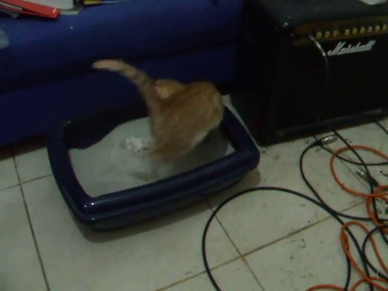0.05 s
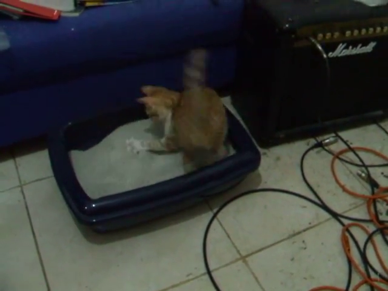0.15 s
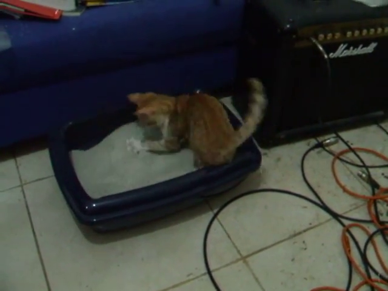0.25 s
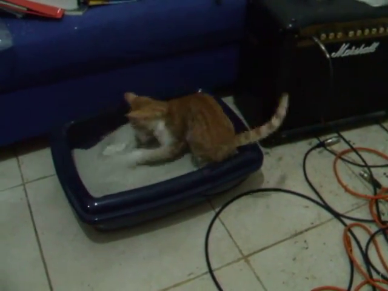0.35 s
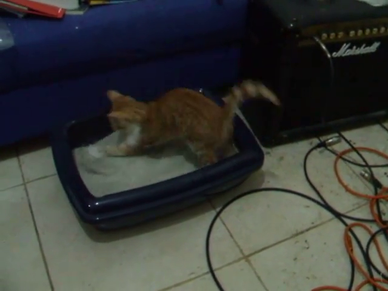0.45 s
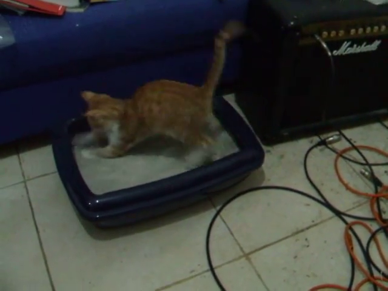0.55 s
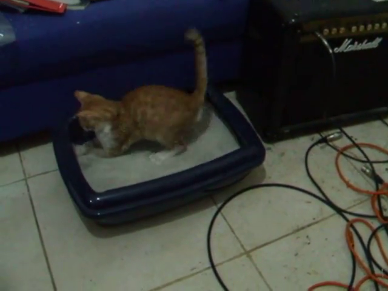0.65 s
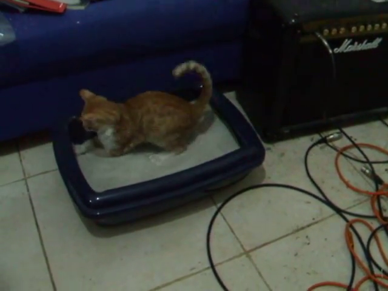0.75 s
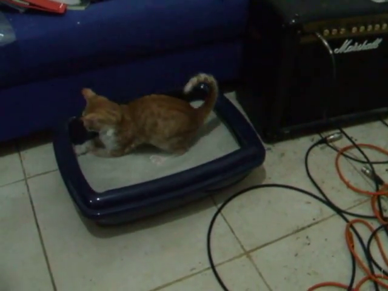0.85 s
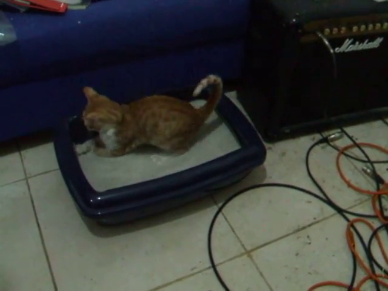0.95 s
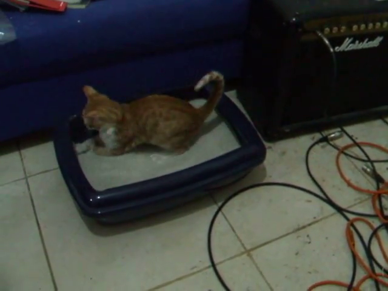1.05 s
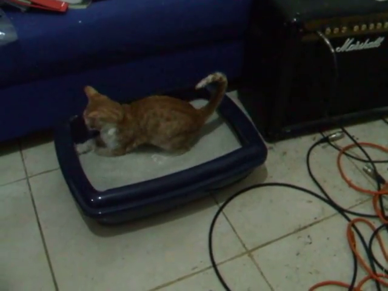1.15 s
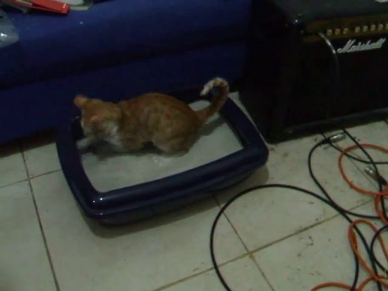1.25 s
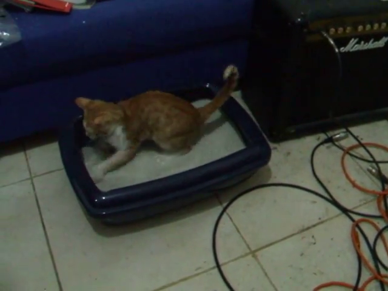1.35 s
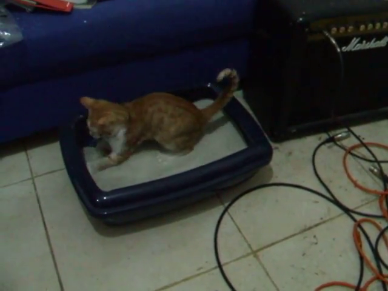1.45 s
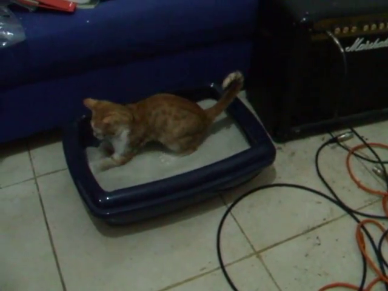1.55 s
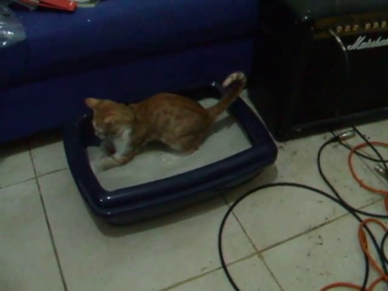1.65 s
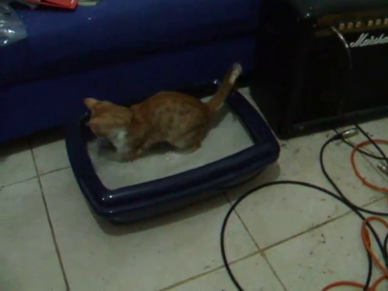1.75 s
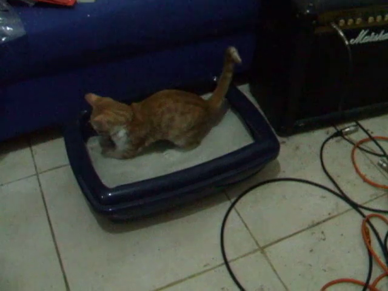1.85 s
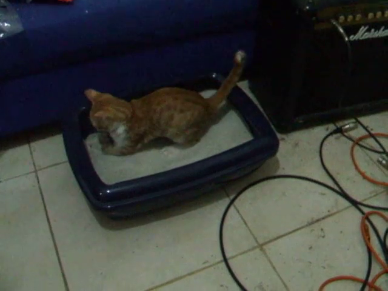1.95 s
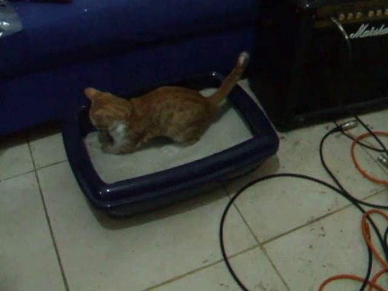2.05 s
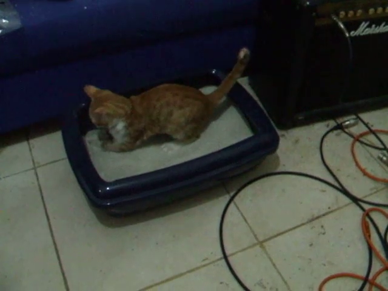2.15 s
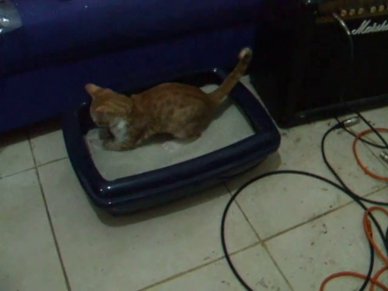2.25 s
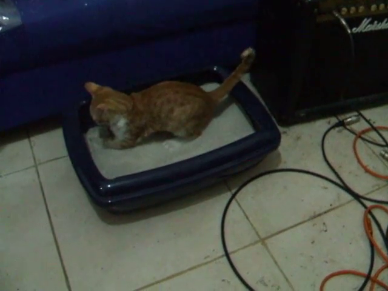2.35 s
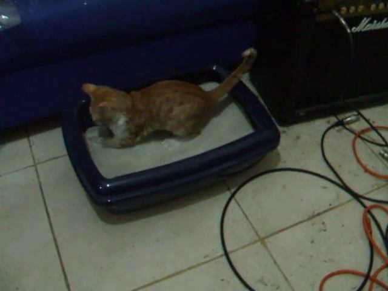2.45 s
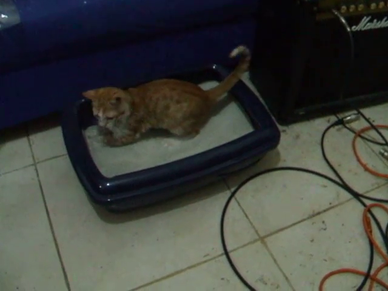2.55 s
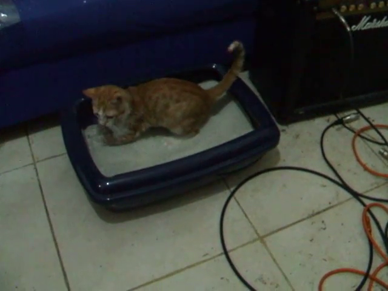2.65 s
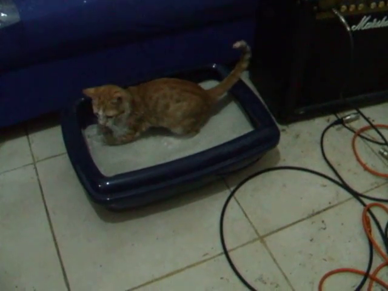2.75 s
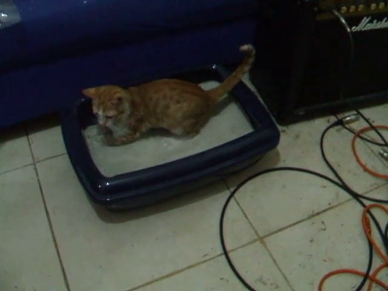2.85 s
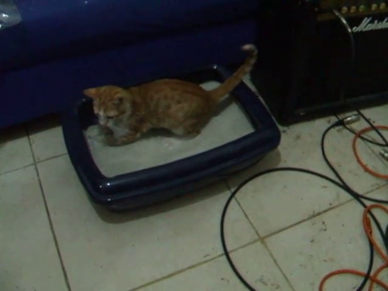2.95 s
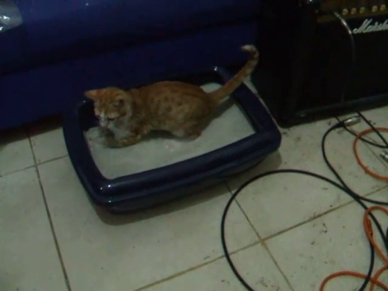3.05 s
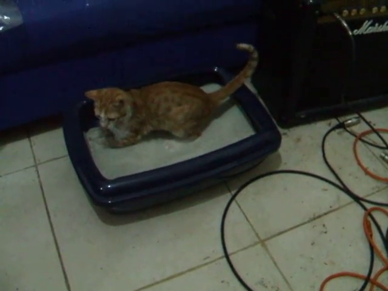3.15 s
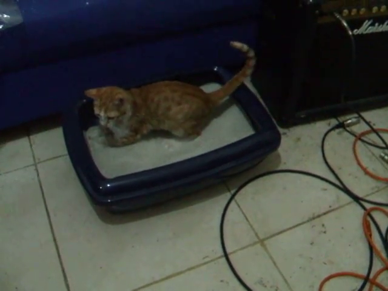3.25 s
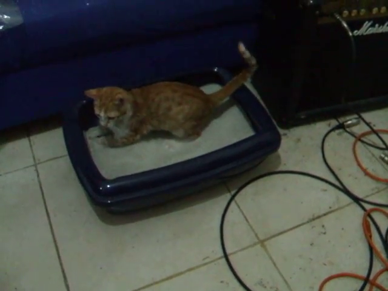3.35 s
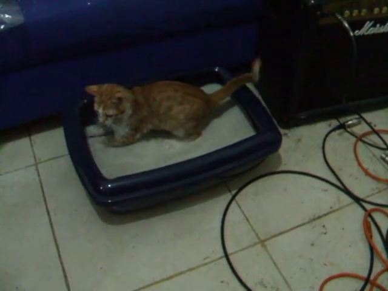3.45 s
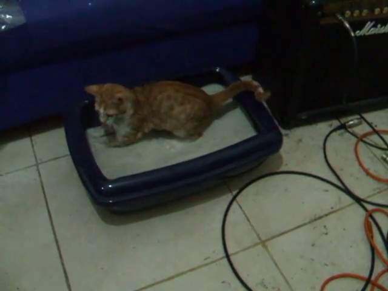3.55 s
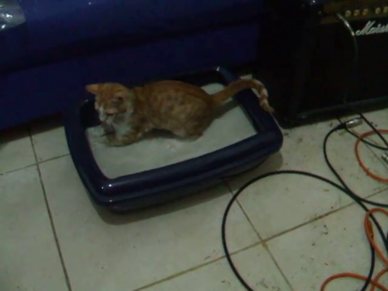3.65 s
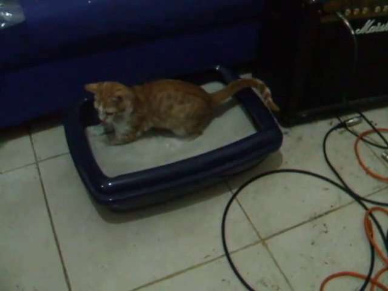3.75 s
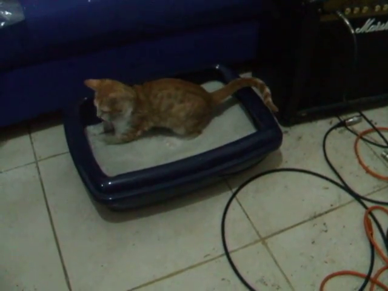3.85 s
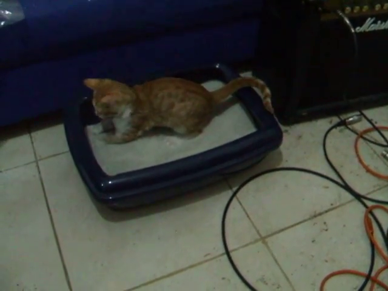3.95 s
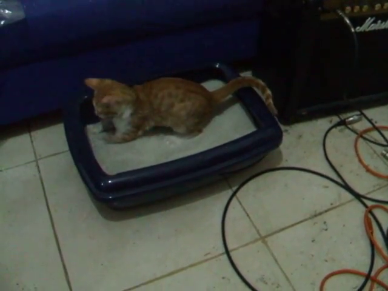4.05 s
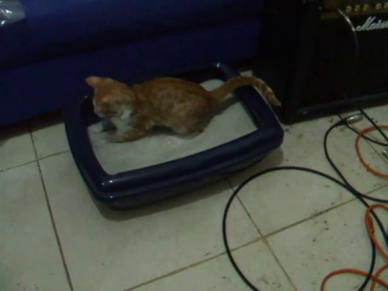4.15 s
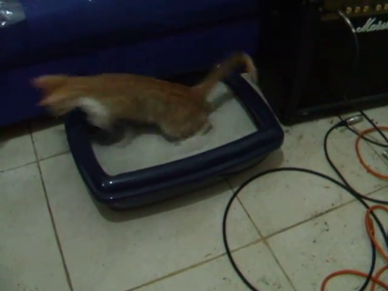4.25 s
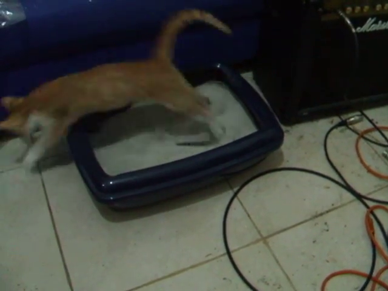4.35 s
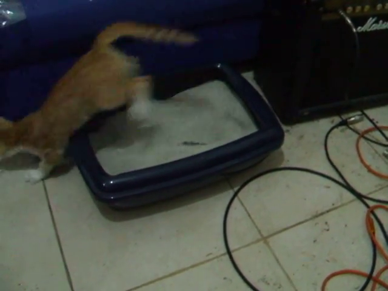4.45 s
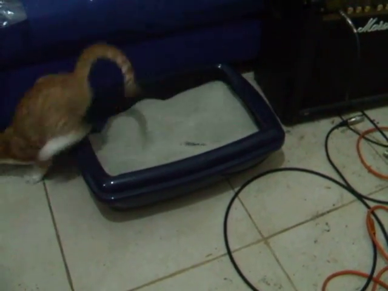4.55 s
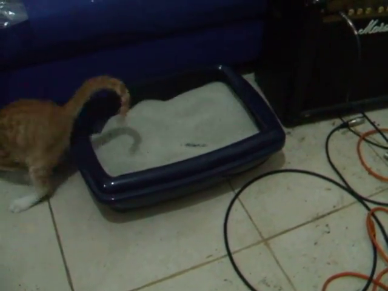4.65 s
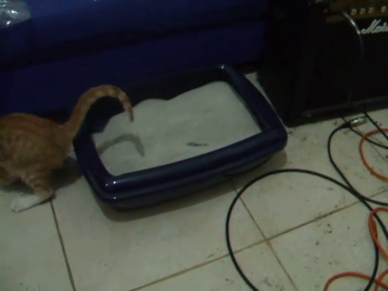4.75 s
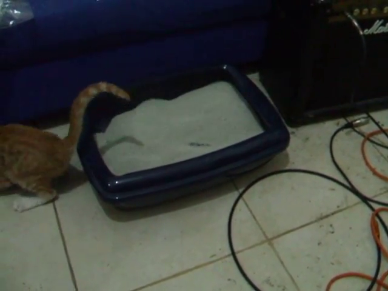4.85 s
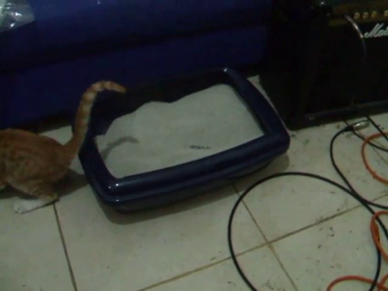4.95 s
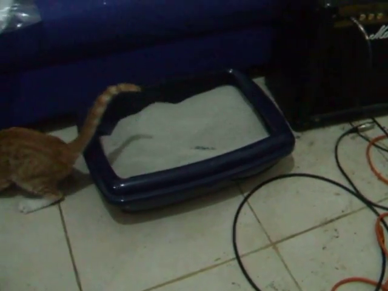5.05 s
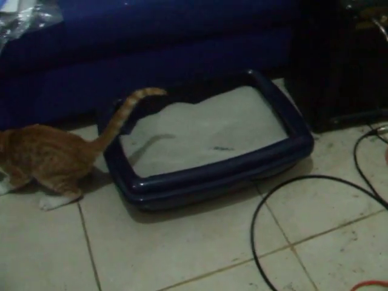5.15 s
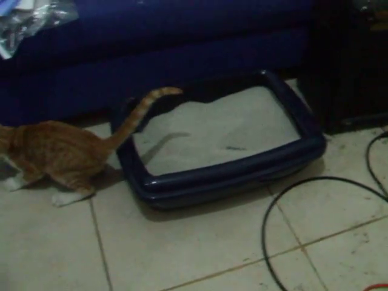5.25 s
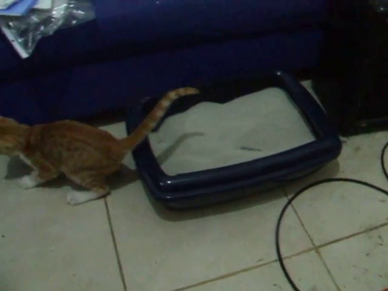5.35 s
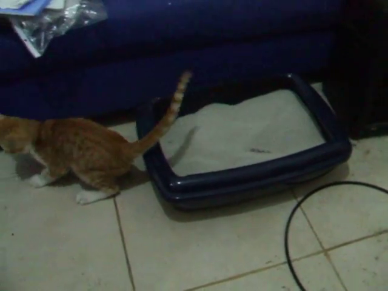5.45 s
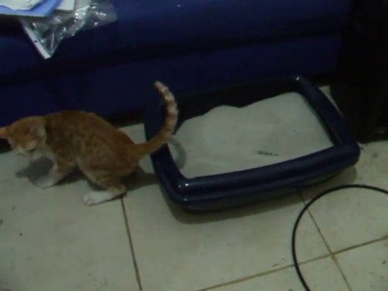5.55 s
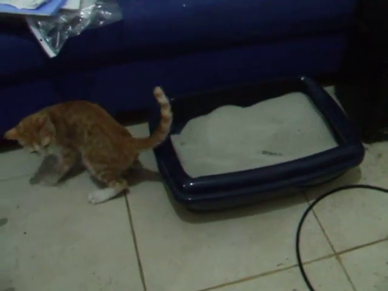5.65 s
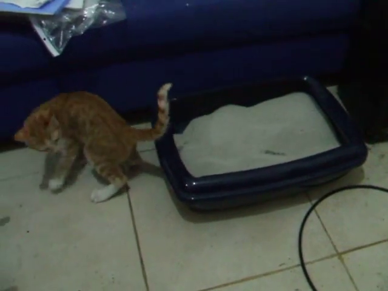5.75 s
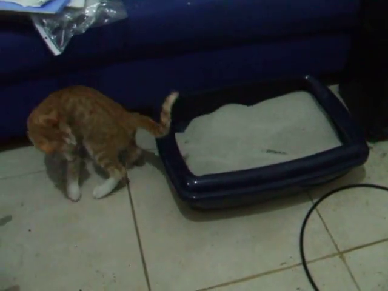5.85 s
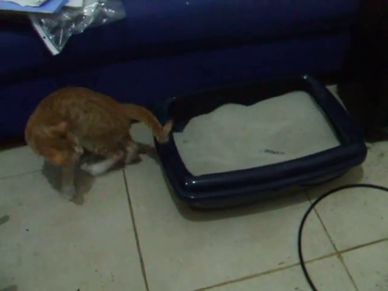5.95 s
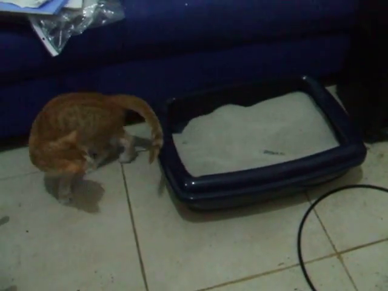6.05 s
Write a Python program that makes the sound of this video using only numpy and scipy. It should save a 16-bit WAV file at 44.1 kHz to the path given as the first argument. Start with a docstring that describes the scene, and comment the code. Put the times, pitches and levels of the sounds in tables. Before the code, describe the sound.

A kitten digs in a plastic tray of dry granular litter, heard close up in a small tiled room with a short reverberation. A wavering low hum, a thin high electronic whine and the gritty hiss of a cheap camera run throughout. From 0 to 0.8 seconds, quick overlapping strokes rasp and crunch, with hollow plastic knocks, the fullest near 0.56, and small claw ticks. After a short gap, brighter, sandier strokes come between 1.2 and 1.5, with a padded thump near 1.3, then a final pair with a sharp rim clack around 1.75. A long lull follows, broken by a faint stroke at 2.5 and a tiny pair near 3.4. At 4.16 to 4.35 a brisk burst of digging sprays grains; around 4.6 the kitten hops out with a soft thump, light tray knock and scattered ticks. Only background remains until one barely audible pad near 6.

```python
"""Close to a litter tray on tiles, in a small room: over a low hum a kitten rakes granular litter for two seconds.
Each stroke lets through dense random grain clicks; paws ring the plastic tray's modes, pads thump and grains tick.
One faint stroke and then a short pair follow in a long lull; past four seconds it digs again, hops out and, near
six, sets down one last soft pad. Throughout, the camera adds a thin whine and the hiss of its coarse converter."""
import sys
import numpy as np
from scipy import signal
from scipy.fft import rfft, irfft
from scipy.io import wavfile
from scipy.ndimage import uniform_filter1d

SR = 44100
rng = np.random.default_rng(int(sys.argv[2]) if len(sys.argv) > 2 else 0)


def store_pcm(level_fs):
    """Save levels as 16-bit WAV."""
    pcm = np.round(np.clip(level_fs, -1, 1) * 32767).astype(np.int16)
    wavfile.write(sys.argv[1], SR, np.atleast_2d(pcm).T)


N = 268740
TIME = np.arange(N) / SR

# All tabled levels are relative unless stated.
# Colour of the steady room air: (frequency [Hz], level per Hz [dB])
AIR_COLOUR = [(20, -13.5), (50, -10), (85, -12), (150, -11.5), (200, -2), (330, -5), (450, -8), (640, -6.5),
              (850, -10.5), (1200, -11), (2200, -17), (4000, -23), (7800, -22), (9000, -30.5)]
# Close deep tones that beat, so that the hum swells and sinks: (frequency [Hz], level [dB])
DEEP_HUM_TONES = [(48.58, -67.6), (49.06, -73), (50.03, -73)]
# Higher, gently wavering tones of the hum: (frequency [Hz], mean level [dB])
HUM_TONES = [(120, -71.5), (193, -66.5), (237, -71.5), (577, -70), (693, -71)]
# Paw strokes in the litter: (start [s], push [s], level [dB], settling [dB/s],
# deep crunch [dB], hiss of the finest grains [dB], claws scraping the plastic [dB])
PAW_STROKES = [ (0.005, 0.1, -37, 245, -7, -3, -5.5), (0.195, .022, -30.5, 171, -7, -1, -8.5),
               (0.297, .082, -39, 154, -7, -.5, -9.5), (0.434, 0.078, -37, 91, -5.5, 1.5, -12),
               (0.559, 0.023, -32.5, 224, -6, -0.5, -11), (0.629, 0.051, -32, 227, -7.5, -2, -17.5),
               (0.735, 0.024, -41.5, 138.5, -5.5, -0.5, -5), (1.196, 0.063, -33.5, 149, -14.5, -0.5, -21),
               (1.320, 0.0053, -33.5, 178, -11, -3, -19.5), (1.384, .024, -37, 136, -7, 4, -20),
               (1.453, 0.04, -42, 141.5, -24, 6, -20), (1.698, 0.032, -42, 205, -7.5, -2, -9),
               (1.749, 0.025, -32, 236, -12.5, -0.5, -10.5), (2.514, .037, -47.5, 194, -18, 1, -22),
               (3.392, 0.052, -47.5, 260, -14, 4, -21.5), (3.470, 0.023, -50.5, 200, -16, 2.5, -15.5),
               (4.16, 0.066, -30.5, 176, -12.5, -1, -17.5), (4.258, 0.037, -30, 182, -15, -4.5, -9),
               (4.301, 0.029, -32, 140.5, -6, 1.5, -11), (4.594, .060, -51.5, 94, -16, 1.5, -16), ]
# Colour of the sliding grains: (frequency [Hz], level [dB])
GRAIN_COLOUR = [(300, -29), (900, -14.5), (1400, -14.5), (1900, -7), (2300, -2), (2700, -3), (3400, -2.5),
                (4500, -6.5), (6000, -11), (9000, -22)]
# Colour of the finest grains: (frequency [Hz], level [dB])
FINE_COLOUR = [(1000, -31), (3000, -16), (4500, -2.5), (6000, -5.5), (7700, -1), (9000, -5)]
# Colour of the packed litter under a digging paw: (frequency [Hz], level [dB])
CRUNCH_COLOUR = [(80, -23), (180, -13), (300, 2), (520, -9.5), (800, -1), (1200, 0.5), (1700, 4.5),
                 (3000, -25.5)]
# Paws against the tray: (time [s], thud of the bottom [dB], ring of the walls [dB],
# clack of the rim [dB], change per rebound [dB])
TRAY_KNOCKS = [(0.196, -15, -21, -35, -1.56), (0.37, -16, -25, -47, -7.5), (0.5621, -4.5, -2, -8, -4),
               (0.639, -12, -17.5, -30, -2.5), (1.324, -10.5, -34, -17.5, -16),
               (1.42, -12.5, -18, -10.5, -7), (1.7531, -2.5, -8, 0, -4.5), (4.616, -19.5, -26, -29, -10)]
# Modes of the loaded tray: (frequency [Hz], level [dB], 60 dB decay time [s])
TRAY_MODES = [(209, -8, 0.058), (286, 7, .04), (340.2, -1.5, 0.044), (408, -1, 0.051), (659, 6.5, .022),
              (785, 1, 0.059), (956, 3, 0.032), (1618, -4, 0.011), (2173, 6, 0.019), (3010, -6, .015),
              (3735, -8, 0.0097), (4320, -7.5, 0.016), (5350, -4, 0.022)]
# Colour of the tray's crowded, heavily damped overtones: (frequency [Hz], level [dB])
CLACK_COLOUR = [(60, -18), (150, -9), (300, 11.5), (500, 6.5), (800, 4.5), (1300, 2), (2200, -0.5),
                (4500, 3.5), (6000, -7), (8000, -5)]
# The kitten's weight coming down on its soft pads: (time [s], peak level before the room [dB])
PAD_FALLS = [(0.201, -48), (0.366, -45.5), (0.64, -43), (1.3253, -34.5), (1.752, -37), (4.617, -39.5),
             (5.986, -49.5)]
# Colour of a padded thump on the hard floor: (frequency [Hz], level [dB])
THUMP_COLOUR = [(40, -9.5), (90, -5.5), (160, -2.5), (280, 4), (400, -8), (600, -27), (1500, -42)]
# Claws and stray grains ticking on plastic and tile: (time [s], level [dB])
TICK_CONTACTS = [(0.4403, -11.5), (0.5616, -2.5), (0.765, -27), (1.29, -14.5), (1.3942, -23.5),
                 (1.4169, -11), (1.7503, -6), (1.9327, -25), (4.3013, -18), (4.5383, -24), (4.6013, -21),
                 (4.620, -23), (4.67, -25.5), (4.7225, -26)]

AIR_DB = -54  # rms between 70 and 7600 Hz
DEEP_HUM_DB, SWELL_S = 0.5, 3.85  # common gain of the deep tones [dB], moment of a full swell [s]
WHINE_HZ, WHINE_DB, FRAME_HZ = 7867, -61.5, 30  # the camera's thin electronic whine and its frame rate
# Every stroke: the paw bites in, pushes up to full flow, then the grains settle
BITE_S, BITE_BELOW_DB, LINGER_S = 0.0023, 12.5, .012
# The struck tray rocks against the floor: mean interval [s], scatter (standard deviation) as a share of it
REBOUND_S, REBOUND_SCATTER = .0135, .15
REBOUND_RIM_DB = -5  # rebounds reach the rim less
ROOM_T60_S, ROOM_DB = 0.22, -3.5  # 60 dB decay time, room level for the contacts
CONVERTER_HZ, STEP = 16000, .0055  # the camera's sample rate, size of one step (full scale 1)
TOP_HZ = 8900  # upper edge of the camera's sound


def undb(db):
    """Decibels to gain."""
    return 10 ** (np.asarray(db) / 20)


def unit(x):
    """Scale to rms 1."""
    return x / np.sqrt(np.mean(x ** 2))


def colour(x, points):
    """Causal filter through (frequency [Hz], level [dB]) points, built from the cepstrum of its gain."""
    hz, db = np.transpose(points)
    size = 4096
    grid = np.maximum(np.fft.rfftfreq(size, 1 / SR), 1)
    gain = undb(np.interp(np.log(grid), np.log(hz), db))
    cepstrum = irfft(np.log(gain))
    # folding the cepstrum forward in time gives minimum phase
    cepstrum[1:size // 2] *= 2
    cepstrum[size // 2 + 1:] = 0
    response = irfft(np.exp(rfft(cepstrum)))
    return signal.fftconvolve(x, response)[:len(x)]


def band_unit(x, lo_hz, hi_hz):
    """Scale so that the given band has rms 1."""
    bandpass = signal.butter(4, [lo_hz, hi_hz], "band", fs=SR, output="sos")
    return x / np.std(signal.sosfilt(bandpass, x))


def walk(rate):
    """Smooth random drift with rms 1, from `rate` random knots per second."""
    knots = rng.standard_normal(4096)
    drift = np.interp(TIME * rate, np.arange(len(knots)), knots)
    return unit(uniform_filter1d(drift, max(int(SR / rate / 2), 1)))


def add(track, s, sound):
    """Mix a sound into the track at time s."""
    start = int(s * SR)
    part = sound[:max(N - start, 0)]
    track[start:start + len(part)] += part


def background():
    """Filtered noise for soft room air, beating and wavering sines for the hum, and the camera's whine."""
    air = undb(AIR_DB) * band_unit(colour(rng.standard_normal(N), AIR_COLOUR), 70, 7600)
    deep = np.zeros(N)
    for hz, db in DEEP_HUM_TONES:
        tone = unit(np.cos(2 * np.pi * hz * (TIME - SWELL_S)))
        deep += undb(db + DEEP_HUM_DB) * tone
    hum = np.zeros(N)
    for hz, db in HUM_TONES:
        level = undb(db + 1.5 * walk(4))
        hum += level * unit(np.sin(2 * np.pi * hz * TIME + .6 * walk(5)))
    flip = np.sign(np.sin(np.pi * FRAME_HZ * TIME))  # the whine flips its phase at the frame rate
    whine = undb(WHINE_DB) * flip * unit(np.sin(2 * np.pi * WHINE_HZ * TIME))
    return air + deep + hum + whine


def stroke_flow(start_s, push_s, settle_db_per_s):
    """Flow of grains in one stroke: a quick bite, a rounded push, then a steady dying away."""
    t = TIME - start_s
    bite = np.exp(np.clip(t / BITE_S, -20, 0))
    push_db = -BITE_BELOW_DB * (1 - np.clip(t / push_s, 0, 1)) ** 2
    past_push = np.maximum(t - push_s, 0)
    settle_db = -settle_db_per_s * (np.hypot(past_push, LINGER_S) - LINGER_S)  # rounded start
    return bite * undb(push_db + settle_db)


def collisions(per_s, spread_db):
    """Random clicks of either sign: many faint, a few strong."""
    hit = rng.random(N) < per_s / SR
    sizes = undb(spread_db * np.minimum(rng.exponential(size=N), 5))
    return unit(hit * sizes * rng.choice([-1, 1], N))


def rings(hz, t60):
    """One decaying sine per mode, as rows."""
    t = TIME[:SR // 6]
    sign = (-1) ** np.arange(len(hz))[:, None]  # neighbouring modes swing against each other
    return sign * np.sin(2 * np.pi * np.outer(hz, t)) * undb(-60 * t / t60[:, None])


def litter():
    """Grains slide in little avalanches; a deeper paw crunches the packed bed and its claws scrape the plastic."""
    drive = np.zeros((4, N))
    for s, push_s, db, settle, deep_db, fine_db, scrape_db in PAW_STROKES:
        flow = undb(db) * stroke_flow(s, push_s, settle)
        layers = np.outer(undb([0, fine_db, deep_db, scrape_db]), flow)
        drive = np.maximum(drive, layers)  # the stronger stroke takes over
    slide, sift, dig, scrape = drive

    coarse = band_unit(colour(collisions(per_s=6000, spread_db=2.7), GRAIN_COLOUR), 1500, 8000)
    fine = band_unit(colour(collisions(per_s=5500, spread_db=3.0), FINE_COLOUR), 1500, 8000)
    bed = band_unit(colour(collisions(per_s=4000, spread_db=2.5), CRUNCH_COLOUR), 500, 1500)
    grains = undb(-2.5) * slide * coarse + undb(-6.0) * sift * fine + undb(-3.5) * dig * bed

    # sharp claws reach only the high modes
    hz, db, t60 = np.transpose([mode for mode in TRAY_MODES if mode[0] > 1200])
    claws = collisions(per_s=1800, spread_db=6.5)
    plastic = unit(signal.fftconvolve(claws, undb(db) @ rings(hz, t60))[:N])

    avalanches = undb(.8 * walk(260))
    return room(avalanches * (grains + scrape * plastic), wet_db=-8.5)


def room(x, wet_db):
    """Direct sound plus a short diffuse tail from tiles and walls: decaying noise with a soft onset."""
    t = TIME[:SR // 2]
    onset = 1 - np.exp(-(t / 0.0043) ** 2)
    tail = rng.standard_normal(len(t)) * undb(-60 * t / ROOM_T60_S) * onset
    tail = colour(tail, [(100, -2.0), (300, -6.5), (700, 0.5), (4000, -2), (9000, -0.5)])
    return x + undb(wet_db) * signal.fftconvolve(x, tail / np.linalg.norm(tail))[:N]


def blows(count=7):
    """Each knock and its rebounds, as rows (time [s], bottom [dB], walls [dB], rim [dB])."""
    rows = []
    for s, bottom_db, wall_db, rim_db, rebound_db in TRAY_KNOCKS:
        rows.append((s, bottom_db, wall_db, rim_db))
        rebound_parts_db = np.array([bottom_db, wall_db, rim_db + REBOUND_RIM_DB])
        for k in range(1, count):
            late = REBOUND_S * (k + REBOUND_SCATTER * rng.standard_normal())
            rows.append((s + late, *(rebound_parts_db + k * rebound_db)))
    return rows


def tray():
    """A paw rings the tray's modes; where it lands decides whether bottom, walls or rim speak."""
    out, t = np.zeros(N), TIME[:SR // 6]
    hz, db, t60 = np.transpose(TRAY_MODES)
    part_hz = [333, 587, 1010, 2020]  # bottom below, walls between, rim above
    for s, bottom_db, wall_db, rim_db in blows(count=7):
        part_db = [bottom_db, wall_db, wall_db, rim_db]
        place_db = np.interp(np.log(hz), np.log(part_hz), part_db)
        detuned = hz * (1 + 0.018 * rng.standard_normal(len(hz)))  # the kitten's weight shifts the modes
        add(out, s, undb(db + place_db - 26.5) @ rings(detuned, t60))
        # overtones too crowded to hear apart make a short clack
        burst = rng.standard_normal(len(t)) * np.exp(-t / 0.0043)
        clack = colour(colour(burst, CLACK_COLOUR), list(zip(part_hz, part_db)))
        add(out, s, undb(-15.5) * clack)
    return out


def footfalls():
    """A soft pad on the hard floor: a low-coloured noise burst that dies away over some ten milliseconds."""
    out, t = np.zeros(N), TIME[:SR // 10]
    for s, db in PAD_FALLS:
        push = colour(rng.standard_normal(len(t)) * np.exp(-t / 0.01), THUMP_COLOUR)
        add(out, s, undb(db) * push / np.abs(push).max())
    return out


def ticks():
    """Hard little contacts: each a crack of noise lasting a few milliseconds."""
    out, t = np.zeros(N), TIME[:SR // 20]
    for s, db in TICK_CONTACTS:
        crack = rng.standard_normal(len(t)) * np.exp(-t / 0.0023)
        add(out, s, undb(db - 9.5) * crack)
    return colour(out, [(200, -23.5), (1000, -8.0), (2200, 1), (4500, 2.0), (7500, -3.5), (9500, 0.5)])


def scene():
    """Background, litter, tray, footfalls and ticks in the room, on one channel."""
    contacts = tray() + footfalls() + ticks()
    return (background() + litter() + room(contacts, wet_db=ROOM_DB))[None]


def record(dry):
    """The camera samples slowly and in coarse steps, so quiet moments turn into a gritty hiss."""
    sampled = signal.resample(dry, int(np.ceil(N * CONVERTER_HZ / SR)), axis=-1)
    stepped = STEP * (np.floor(sampled / STEP) + .5)
    # a gentle smoothing filter lets the top of the band mirror about half the sample rate
    smooth = signal.resample_poly(stepped, SR, CONVERTER_HZ, axis=-1, window=("kaiser", 3))[:, :N]
    lowpass = signal.ellip(8, .2, 70, TOP_HZ, fs=SR, output="sos")
    return signal.sosfilt(lowpass, smooth)


dry = scene()
out = record(dry)
store_pcm(out)
```